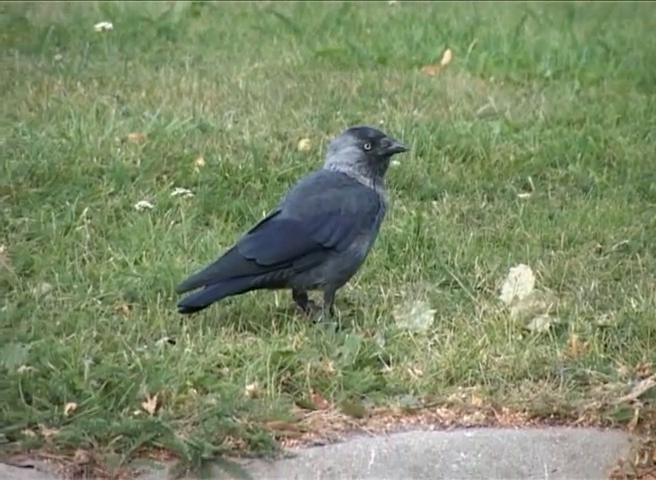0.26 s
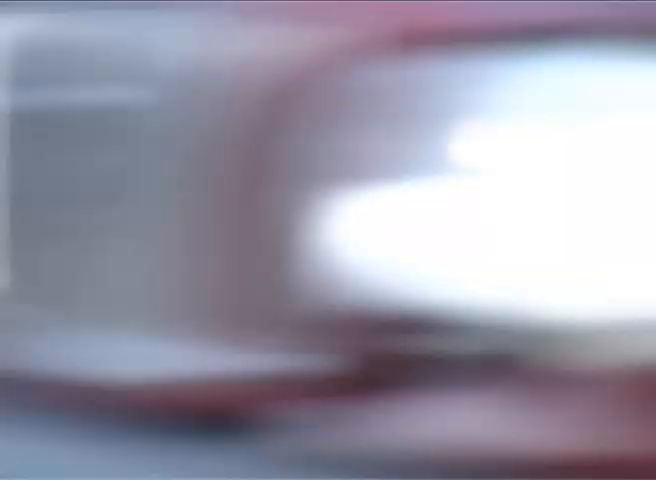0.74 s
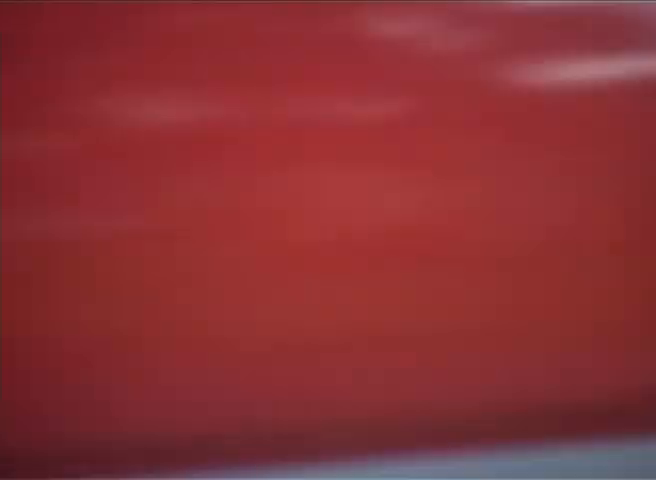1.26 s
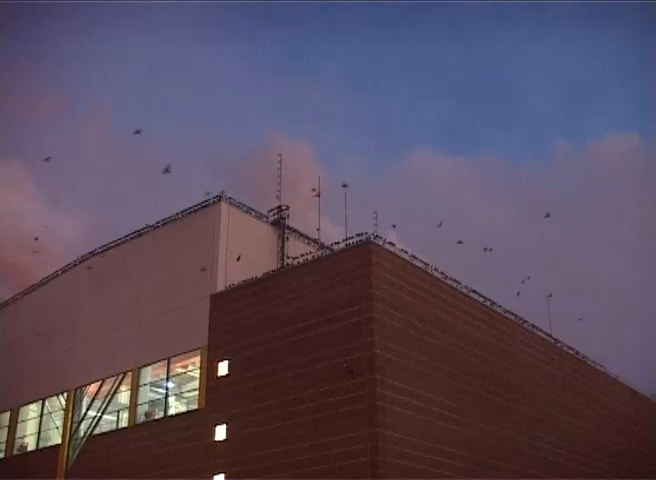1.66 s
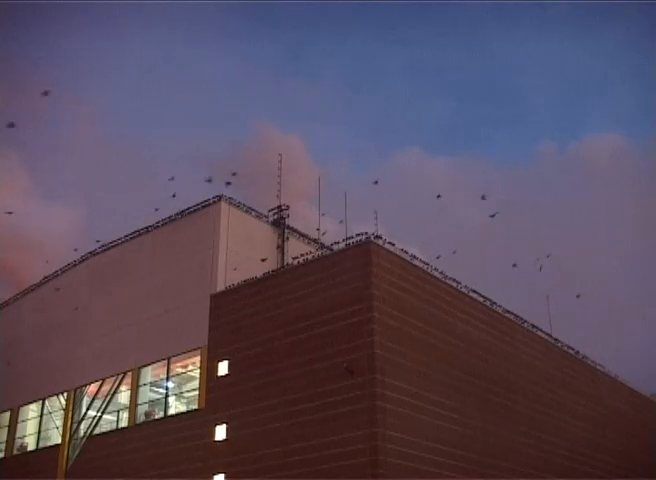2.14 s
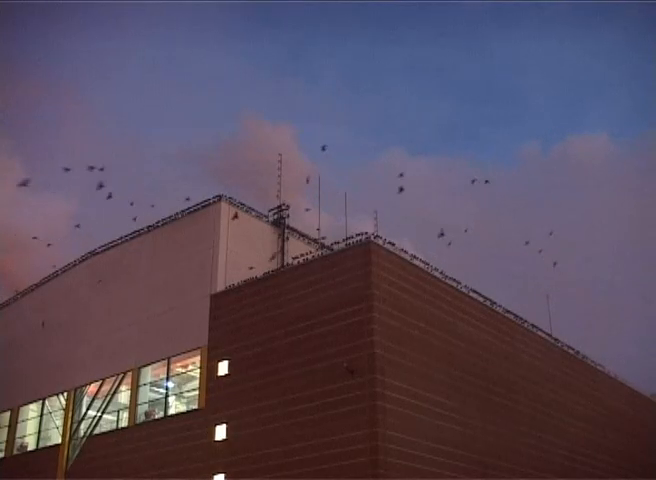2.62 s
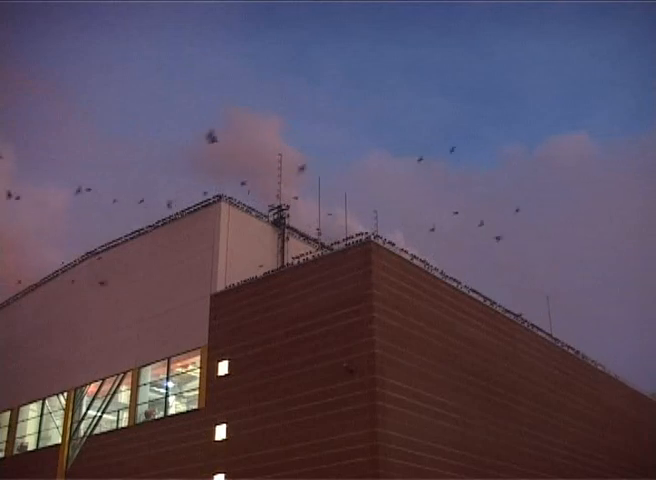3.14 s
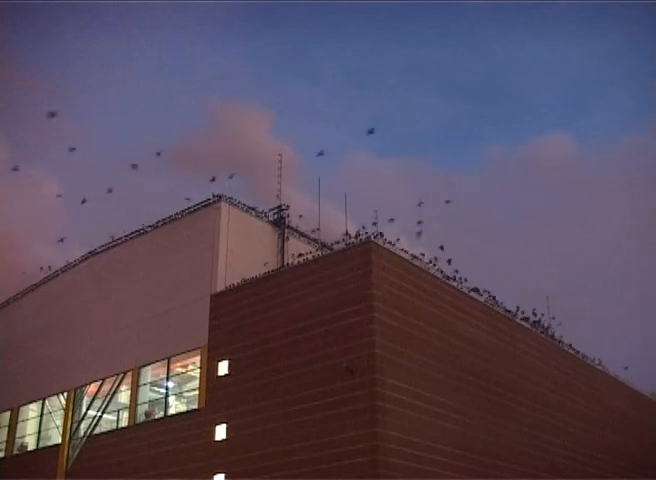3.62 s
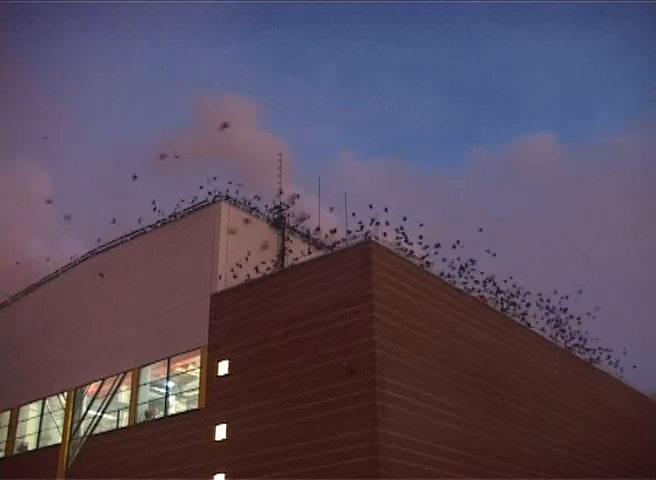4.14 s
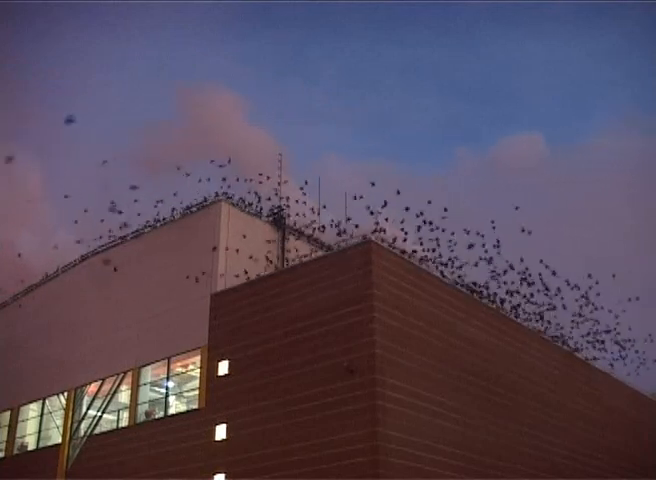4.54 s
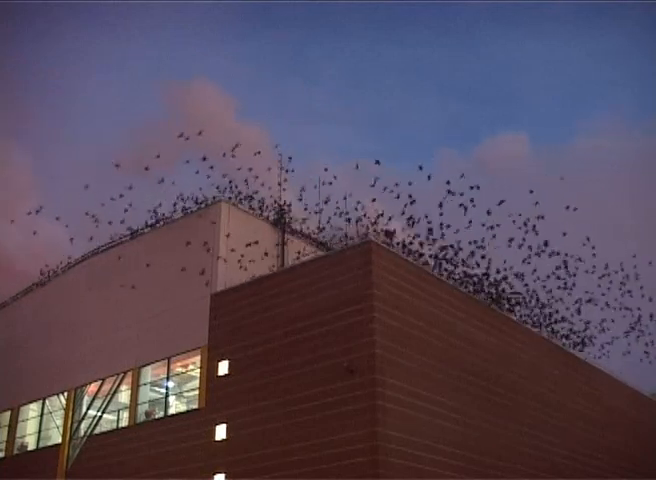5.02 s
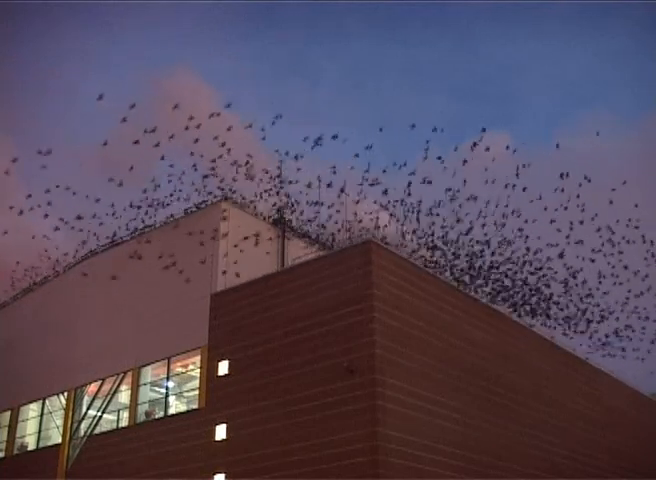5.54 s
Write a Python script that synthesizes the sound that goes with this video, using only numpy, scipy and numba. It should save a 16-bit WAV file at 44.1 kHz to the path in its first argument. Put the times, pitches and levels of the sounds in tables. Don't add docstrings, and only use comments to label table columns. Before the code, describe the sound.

A bus passes close with broad tyre and engine roar, shifting drone and faint air hiss, jackdaws chattering beneath. At a hard cut it vanishes; a dense flock calls around city roofs over soft traffic rumble. A small handheld camera adds low buzz, faint whine, rustles and two harsh plastic creaks midway. The chatter swells loudest near the end.

```python
import sys
import numpy as np
from scipy import signal
from scipy.fft import rfft, irfft, next_fast_len
from scipy.io import wavfile
from scipy.ndimage import uniform_filter1d
from numba import njit

SR = 44100
rng = np.random.default_rng(int(sys.argv[2]) if len(sys.argv) > 2 else 0)


def digitize_waveform(pressure):
    field = np.atleast_2d(pressure).T
    bounded = np.clip(field, -1, 1)
    quanta = np.round(bounded * 32767).astype(np.int16)
    wavfile.write(sys.argv[1], SR, quanta)


def gain_from_db(level_db):
    decades = np.asarray(level_db, float) / 20
    return 10 ** decades


N = 254898
TIME = np.arange(N) / SR
EDIT_S = 1.706
FRAME_HZ, SCAN_HZ, MOTOR_HZ = 25, 15625, 150

# t/s, hold/s, level/dB
CHATTER_WAVES = [(.17, 0.033, -36.5), (.33, 0.046, -36.5), (.55, 0.22, -39.5), (.8, 0.21, -35.5),
                 (1.23, 0.096, -38), (1.5, 0.12, -40), (1.69, 0.055, -39), (1.87, 0.12, -34),
                 (2.11, 0.25, -33), (2.44, 0.28, -34.5), (2.82, 0.081, -35.5), (2.9, 0.086, -31.5),
                 (3.16, 0.11, -33.5), (3.3, 0.29, -35.5), (3.62, 0.13, -34.5), (3.87, 0.031, -32),
                 (3.95, 0.19, -38), (4.264, 0.14, -33.5), (4.45, 0.28, -37), (4.68, 0.076, -39),
                 (4.82, 0.097, -33.5), (5.03, 0.013, -34.5), (5.08, 0.055, -32.5), (5.24, 0.036, -31.5),
                 (5.3, 0.02, -28), (5.4, 0.026, -25.5), (5.5, 0.18, -32), (5.64, 0.17, -28.5)]
# f/Hz, gain/dB
FAR_VOICE_TONE = [(500, -29), (1100, -11.5), (1550, -8.5), (1950, -3.5), (2350, 0), (2750, -3.5),
                  (3200, -20.5), (4200, -13.5), (5000, -20.5), (6100, -18), (6900, -32.5), (9000, -36.5)]
# t/s, length/s, first pitch f/Hz, last pitch f/Hz, level/dB
OPEN_CALLS = [(1.905, .022, 1320, 1186, -40), (2.106, .029, 1308, 1103, -43), (2.327, .03, 1605, 1430, -35),
              (2.637, .047, 1214, 1114, -44), (3.256, .029, 1573, 1178, -43), (3.055, .03, 1520, 1150, -44),
              (3.617, .074, 1235, 1070, -39), (3.85, .059, 1265, 1140, -39), (4.244, .03, 1447, 1200, -46),
              (4.692, .05, 1450, 1060, -37.5), (4.722, .032, 1530, 1215, -42),
              (5.065, .029, 1308, 1103, -44), (5.385, .018, 1510, 1400, -33),
              (5.394, .029, 1605, 1355, -37), (5.402, .058, 760, 625, -43), (5.543, .029, 1545, 1354, -40),
              (5.6, .032, 1300, 1130, -43)]
# t/s, length/s, first pitch f/Hz, last pitch f/Hz, level/dB
MELLOW_CALLS = [(1.848, .052, 1390, 980, -44), (1.94, .03, 1330, 1150, -48), (1.965, .05, 1250, 920, -47),
                (2.11, .035, 1280, 1050, -46), (2.91, .025, 1300, 1200, -47), (2.97, .03, 1300, 1150, -47),
                (3.39, .04, 1260, 1200, -47), (3.46, .035, 1330, 1180, -47), (4.49, .04, 1300, 1050, -49),
                (5.3, .035, 1340, 1230, -45), (5.41, .035, 1400, 1180, -42), (5.44, .03, 1400, 1100, -45),
                (5.61, .035, 1290, 1200, -46), (5.655, .035, 1250, 1080, -45), (1.9, .025, 1200, 980, -46),
                (2.45, .03, 1250, 1100, -49), (3.24, .035, 1250, 1080, -47), (2.05, .03, 1400, 1200, -49),
                (2.15, .03, 1330, 1200, -47), (2.246, .029, 1366, 1300, -48),
                (2.278, .029, 1150, 1024, -46), (2.506, .029, 1445, 1082, -47),
                (2.645, .04, 1200, 1050, -46), (2.93, .028, 1150, 940, -46), (2.95, .022, 1239, 1069, -47),
                (3.15, .035, 1250, 1080, -46), (3.6, .03, 1230, 1200, -49), (4.258, .022, 1324, 1200, -45),
                (4.349, .047, 1243, 1105, -52), (4.425, .04, 1340, 980, -46),
                (4.494, .022, 1358, 1269, -52), (4.712, .042, 1340, 990, -46),
                (4.81, .025, 1250, 1050, -50), (5.083, .029, 1330, 1208, -46),
                (5.122, .022, 1330, 1242, -46), (5.535, .029, 1245, 1132, -46),
                (5.669, .022, 1157, 1122, -44), (5.74, .038, 1270, 1150, -45)]
# t/s, first pitch f/Hz, level/dB
CHIPS = [(1.948, 1600, -46), (3.375, 1090, -45), (2.153, 1560, -46), (2.448, 1090, -42), (2.496, 1484, -41),
         (2.643, 1450, -44), (2.67, 1480, -47), (2.719, 1010, -45), (2.857, 1520, -45), (3.46, 1060, -43),
         (3.054, 1440, -48), (3.08, 1530, -46), (3.257, 1358, -42), (3.385, 1297, -45), (3.585, 1500, -44),
         (3.919, 1029, -42), (4.095, 1193, -40), (4.121, 1034, -42), (4.289, 1100, -41), (4.459, 1012, -43),
         (4.584, 1353, -43), (4.603, 1149, -45), (4.825, 1580, -44), (4.972, 1113, -41), (5.009, 1100, -43),
         (5.166, 1036, -40), (5.296, 1272, -38), (5.323, 1503, -38), (5.525, 1020, -43)]
# f/Hz, gain/dB
NEAR_VOICE_TONE = [(500, -22), (1600, -8), (2000, 0), (2400, 2), (2800, 0), (3250, -16), (4200, -17),
                   (5000, -21), (6100, -20), (6900, -30), (9000, -44)]

# t/s, f/Hz
FIRING_RATE = [
    (0, 81.7),
    (.3, 83.2),
    (.7, 83.74),
    (.98, 81.66),
    (1.07, 78.4),
    (1.1, 73.4),
    (1.215, 67.9),
    (1.42, 86.4),
    (1.7, 83.8),
]
# f/Hz, level/dB per Hz
ROAR_TONE = [(53, -49), (90, -58), (150, -4.5), (380, 0), (415, -3.5), (461, -2.5), (982, 2.5),
             (1370, -5.5), (2410, -10), (3130, -21), (6000, -38), (7800, -59), (13200, -120)]
# t/s, hold/s, level/dB
ROAR_PASS = [
    (.3, 1.1, -32.5),
]
# f/Hz, level/dB per Hz
HISS_TONE = [(1760, -31), (3000, -20), (3260, 0), (4290, 2.5), (5610, -5), (6300, 1.5), (7380, -8),
             (8070, -6), (8640, -18), (9580, -5), (10400, -14), (11400, -6), (13500, -17), (14800, -12),
             (15500, -23)]
# t/s, hold/s, level/dB
HISS_PASS = [
    (.93, 0.085, -53),
    (1.42, 0.059, -61.5),
]
BODY_DRONES = {2: [(.5, 0.44, -47.5), (1.09, 0.12, -40), (1.5, .2, -54)], 3: [(.15, 0.67, -45),
               (.88, 0.17, -38.5), (1.5, 0.21, -43.5)], 5: [(.1, 0.3, -40.5), (.6, 0.16, -48),
               (.9, 0.093, -41.5)], 9: [(.8, 0.19, -39.5)], 15: [(1.03, 0.056, -40)]}

# t/s, peak level/dB, ring f/Hz
SHORT_CREAK_SLIPS = [(3.7551, -15.5, 1850), (3.756, -12.0, 2130), (3.7571, -14.5, 1920),
                     (3.7595, -5.0, 1930), (3.7616, -6.0, 2030), (3.7632, -10.0, 2100),
                     (3.7645, -5.0, 2080), (3.7659, -9.5, 2390), (3.7687, -2.0, 2230),
                     (3.7707, -12.0, 2310), (3.7719, -4.5, 2270), (3.7728, -5.0, 2430),
                     (3.7743, -9.5, 2640), (3.7754, -11.0, 2050), (3.7767, 1.0, 1990), (3.7779, -5.5, 2010),
                     (3.7789, -6.5, 2640), (3.7799, -21.5, 2930), (3.7808, -6.5, 2280),
                     (3.7828, -12.5, 1870), (3.7841, -8.0, 2100), (3.7855, -2.0, 2070),
                     (3.7874, -11.5, 1770), (3.7891, -20.5, 2080)]
# t/s, peak level/dB, ring f/Hz
LONG_CREAK_SLIPS = [(3.9848, -18.5, 2150), (3.9908, -19.0, 2000), (3.9925, -23.0, 1750),
                    (3.9966, -21.5, 2190), (3.9998, -19.5, 2120), (4.0021, -7.0, 1890),
                    (4.0049, -14.5, 2130), (4.0082, -10.5, 2050), (4.0113, -10.0, 1850),
                    (4.0145, -7.5, 1930), (4.0162, -14.0, 2190), (4.0194, -8.5, 2060), (4.0256, -5.5, 1870),
                    (4.0272, -9.0, 2140), (4.0297, -15.5, 2160), (4.0312, -12.5, 1800),
                    (4.0328, -19.0, 2150), (4.0361, -11.0, 1980), (4.0388, -18.0, 2850),
                    (4.0409, -10.0, 1570), (4.0424, -13.0, 2300), (4.0454, -9.0, 1760),
                    (4.049, -13.5, 1880), (4.0505, -11.5, 2320), (4.052, -15.5, 1790),
                    (4.0547, -21.5, 2700), (4.0562, -13.0, 1670), (4.0585, -15.5, 1710),
                    (4.0599, -22.5, 1610), (4.0626, -17.0, 2020), (4.0657, -16.0, 1450),
                    (4.0673, -19.0, 2390), (4.0748, -24.5, 1930), (4.0784, -23.5, 2010),
                    (4.0838, -17.5, 1710), (4.0882, -17.0, 1970), (4.0915, -20.0, 1720),
                    (4.0951, -19.0, 1890), (4.0982, -17.0, 1870), (4.1, -17.0, 1860), (4.1038, -24.0, 1720),
                    (4.1064, -21.5, 2060), (4.1113, -20.5, 1820), (4.1153, -20.0, 2060),
                    (4.1175, -19.5, 1820), (4.1215, -22.5, 1780), (4.125, -23.5, 1560),
                    (4.132, -19.0, 2270), (4.1361, -19.0, 2110), (4.1379, -21.5, 2070),
                    (4.1407, -25.0, 2410), (4.1435, -25.0, 1660)]
# t/s, peak level/dB, ring f/Hz
SECOND_MODE_SLIPS = [(4.0025, -31, 3790), (4.0046, -30, 3560), (4.011, -27.5, 3550), (4.0163, -28, 3620),
                     (4.019, -22.5, 3330), (4.0267, -19, 3400), (4.0293, -23.5, 3610), (4.033, -26.5, 3660),
                     (4.0357, -24.0, 3690), (4.0391, -24.5, 3550), (4.044, -20, 3500), (4.0453, -22, 3400),
                     (4.0505, -21, 3480), (4.0548, -27.0, 3530), (4.0583, -28.0, 3450), (4.0622, -26, 3560),
                     (4.0652, -29.0, 3480), (4.0673, -31, 3500), (4.0881, -34, 3460), (4.0911, -36, 3580),
                     (4.0997, -30.0, 3500), (4.1097, -31, 3810), (4.1147, -36, 3410), (4.1258, -33, 3620),
                     (4.1334, -33, 3580), (4.1409, -34, 3690)]
# t/s, peak level/dB, ring f/Hz
TICKS = [(1.705, -39, 4950), (2.455, -39, 7800), (2.568, -37, 7800), (3.143, -37, 7000), (4.405, -38, 5600),
         (4.669, -32, 3920), (4.808, -23, 4000), (3.7605, -14, 3300), (3.7615, -20, 4100),
         (3.7725, -17, 3500), (3.7795, -15, 3400), (3.785, -17, 3500), (4.8075, -37, 7400),
         (5.4349, -21, 2570)]
# t/s, hold/s, level/dB
SCRAPES = [
    (3.757, 0.025, -24.5),
    (3.792, 0.019, -36.5),
    (3.995, .006, -39),
    (4.003, 0.013, -31),
    (4.027, 0.02, -29),
    (4.055, 0.012, -35),
    (4.072, .008, -40),
    (4.083, 0.018, -33.5),
    (4.108, 0.031, -38),
]
# f/Hz, gain/dB
CASING_TONE = [(300, -22), (900, -4), (1500, -2), (2300, -7.5), (3400, -3), (4300, -10), (5200, -21.5),
               (6000, -17), (7000, -27), (7600, -20), (8400, -26), (9200, -24.5), (14000, -37)]
# t/s, hold/s, level/dB
BRUSHES = [(1.72, 0.009, -58), (1.9, .06, -62), (2.12, 0.15, -62), (2.335, .01, -51.5), (2.44, 0.11, -56),
           (2.6, .06, -60), (2.92, 0.27, -61), (3.2, 0.092, -56), (3.42, 0.09, -54), (3.76, .02, -48),
           (3.85, 0.11, -60), (4.02, 0.12, -49), (4.3, 0.11, -52.5), (4.5, .2, -63), (4.81, 0.0033, -54),
           (4.88, 0.028, -53), (5.08, .05, -67), (5.3, 0.27, -53), (5.67, 0.056, -48)]
# f/Hz, level/dB per Hz
BRUSH_TONE = [(3820, 2), (6500, 1), (6940, -7), (7710, 5.5), (8450, -29), (9180, 2.5), (10000, -12),
              (11100, -1.5), (15100, -22), (15500, -19)]

# from t/s, level/dB
BUZZ_STEPS = [(0, -52), (.72, -62), (.95, -50), (.99, -56), (1.12, -63), (1.39, -45), (1.52, -42.5),
              (1.69, -46), (1.78, -59), (1.82, -45.5), (3.21, -52), (3.25, -41.5), (3.46, -50.5),
              (4.02, -62), (4.05, -42.5), (4.36, -45), (5.32, -46), (5.37, -42)]
# multiple of frame rate, level/dB
BUZZ_PARTIALS = [(1, 0.5), (3, -8), (5, -19), (7, -26), (9, -13.5)]
# f/Hz, level/dB
MOTOR_TONE = [(6000, -12), (8000, -1), (12000, -1), (15500, -8)]
# f/Hz, level/dB per Hz
TOWN_TONE = [(53, -22), (90, -16), (119, -10), (403, -5.5), (749, -8.5), (1490, -7), (2280, -5),
             (2590, -6.5), (3280, -19.5), (5850, -28.5), (7090, -38.5), (11100, -46.5), (15000, -47.5)]
# from t/s, top f/Hz
BANDWIDTH_STEPS = [(0, 14300), (1.1, 15650), (1.58, 15000), (1.9, 14500), (2.57, 15650), (2.8, 14500),
                   (3.3, 15650), (3.65, 14900), (4.0, 15300), (4.5, 14600), (5.3, 14700)]


def level(x, db):
    return x * gain_from_db(db) / np.sqrt(np.mean(x ** 2))


def shade(hz, points):
    f, db = np.transpose(points)
    return gain_from_db(np.interp(np.log(hz + 1), np.log(f), db))


def colour(x, points):
    size = next_fast_len(len(x))
    gain = shade(np.fft.rfftfreq(size, 1 / SR), points)
    return irfft(rfft(x, size) * gain, size)[:len(x)]


def walk(rate_hz):
    hold = int(SR / rate_hz)
    steps = np.repeat(rng.standard_normal(N // hold + 1), hold)
    return 1.36 * uniform_filter1d(uniform_filter1d(steps, hold), hold)[:N]


def swells(rows, rise_db_s, fall_db_s):
    power = 0
    for s, hold_s, db in rows:
        rise_db = rise_db_s * np.maximum(s - TIME, 0)
        fall_db = fall_db_s * np.maximum(TIME - s - hold_s, 0)
        power = power + gain_from_db(db - rise_db - fall_db) ** 2
    return np.sqrt(power)


def rush(points, flicker_db, rate_hz):
    size = next_fast_len(N)
    hz = np.fft.rfftfreq(size, 1 / SR)
    spectrum = rfft(rng.standard_normal(size)) * shade(hz, points)
    octave = np.log2(hz / 30 + 1e-9)
    total = np.zeros(N)
    for k in range(10):
        band = irfft(spectrum * np.clip(1 - abs(octave - k), 0, 1), size)[:N]
        total += gain_from_db(flicker_db * walk(rate_hz)) * band
    return level(total, 0)


@njit
def voices(start, length, first, last, bend, arch, size, weight, wobble, out):
    for c in range(len(start)):
        phase = 0.
        for i in range(min(length[c], len(out) - start[c])):
            u = i / length[c]
            hz = first[c] + (last[c] - first[c]) * u ** bend[c] + arch[c] * np.sin(np.pi * u)
            w = (i + 977 * c) % wobble.shape[1]
            phase += 2 * np.pi * hz * (1 + wobble[0, w]) / SR
            turn, partial, total = np.exp(1j * phase), 1 + 0j, 0.
            for k in range(weight.shape[1]):
                partial *= turn
                total += (weight[c, k] * partial).imag
            out[start[c] + i] += size[c] * np.sqrt(np.sin(np.pi * u)) * (1 + wobble[1, w]) * total
    return out


def sing(s, length_s, first_hz, last_hz, db, beak_hz, beak_db, uneven_db, flutter, rasp):
    hz = np.arange(1, 11) * (first_hz + last_hz)[:, None] / 2
    lift_db = beak_db * np.exp(-((hz - beak_hz[:, None]) / 1100) ** 2)
    lift_db = lift_db + uneven_db * rng.standard_normal(hz.shape)
    weight = gain_from_db(lift_db) * (hz < 11000) * np.exp(2j * np.pi * rng.random(hz.shape))
    wobble = np.array([flutter * walk(300), rasp * walk(500)])
    bend = 1 + np.where(length_s > .055, 25, 8) * length_s
    arch_hz = 900 * length_s * (length_s > .06)
    start, length = (s * SR).astype(int), (length_s * SR).astype(int)
    return voices(start, length, first_hz, last_hz, bend, arch_hz, gain_from_db(db), weight, wobble, np.zeros(N))


def echoes(x, t60_s, wet_db):
    t = TIME[:SR // 2]
    tail = rng.standard_normal(len(t)) * np.exp(-np.log(1000) * t / t60_s) * (t > .012)
    return x + gain_from_db(wet_db) * signal.fftconvolve(x, level(tail, 0) / np.sqrt(len(t)))[:N]


def flock(count=1400):
    when, long, pitch, fall, far, beak, low = rng.random((count, 7)).T
    first_hz = (1080 + 520 * pitch) * np.where(low < .2, .55, 1)
    last_hz = first_hz * (.92 - .25 * fall)
    calls = sing(when * N / SR, .012 + .04 * long, first_hz, last_hz, -10 * far, 2000 + 4200 * beak,
                 beak_db=1, uneven_db=2.5, flutter=.005, rasp=.3)
    crowd = echoes(colour(calls, FAR_VOICE_TONE), t60_s=.25, wet_db=-6)
    even = crowd / np.sqrt(uniform_filter1d(crowd ** 2, SR // 14))
    return even * swells(CHATTER_WAVES, rise_db_s=302, fall_db_s=114) * gain_from_db(-3.5)


def near_birds():
    chips = [(s, .025, hz, hz * (1 - .06), db) for s, hz, db in CHIPS]
    calls = [*OPEN_CALLS, *chips, *MELLOW_CALLS]
    s, length_s, first_hz, last_hz, db = np.transpose(calls)
    kind = np.repeat([0, 1, 2], [len(OPEN_CALLS), len(chips), len(MELLOW_CALLS)])
    second_hz = first_hz + last_hz
    beak_hz = np.where(kind == 0, 5100, np.where(kind == 1, 2 * second_hz, second_hz))
    db = db + .3 + 2.5 * (kind == 0)
    song = sing(s, length_s, first_hz, last_hz, db, beak_hz,
                beak_db=14, uneven_db=1.2, flutter=.003, rasp=.27)
    return echoes(colour(song, NEAR_VOICE_TONE), t60_s=.2, wet_db=-12)


def engine_drone():
    s, hz = np.transpose(FIRING_RATE)
    firing_hz = np.interp(TIME, s, hz) * (1 + .002 * walk(31.6))
    phase = 2 * np.pi * np.cumsum(firing_hz) / SR
    total = np.zeros(N)
    for k, rows in BODY_DRONES.items():
        gain = swells(rows, rise_db_s=84, fall_db_s=300) * gain_from_db(2 + .5 * walk(12.8))
        total += gain * np.sin(k * phase)
    return total


def bus():
    roar = swells(ROAR_PASS, rise_db_s=9.5, fall_db_s=8) * gain_from_db(0.74) * rush(ROAR_TONE, 0.16, 9.0)
    hiss = swells(HISS_PASS, rise_db_s=9, fall_db_s=54) * gain_from_db(7.0) * rush(HISS_TONE, 0.28, 8.5)
    return (roar + hiss + engine_drone()) * np.clip((EDIT_S - TIME) / 0.0026, 0, 1)


def ring(rows, rise_s, fall_s):
    lead_s = .0015
    out, t = np.zeros(N + 300), TIME[:300] - lead_s
    for s, db, hz in rows:
        at = int((s - lead_s) * SR)
        envelope = np.exp(-(t / np.where(t < 0, rise_s, fall_s)) ** 2)
        out[at:at + 300] += gain_from_db(db) * np.cos(2 * np.pi * hz * t) * envelope
    return out[:N]


def creak():
    slips = ring([*SHORT_CREAK_SLIPS, *LONG_CREAK_SLIPS, *SECOND_MODE_SLIPS], rise_s=.00042, fall_s=.00075)
    slips += ring(TICKS, rise_s=.0002, fall_s=.0003)
    rings = colour(slips, [(300, -32), (800, -13), (1300, 0), (2000, -.5), (15000, 0)])
    chance, size = rng.random((N, 2)).T
    grains = (chance < .2) * rng.standard_normal(N) * gain_from_db(-1.2 * np.log(size))
    scrape = level(grains, 0) * swells(SCRAPES, rise_db_s=2500, fall_db_s=1300) * gain_from_db(13)
    return rings + colour(scrape, CASING_TONE)


def rustle():
    grain_db = 3.6 * walk(150) + 1.9 * walk(35)
    brushes = swells(BRUSHES, rise_db_s=350, fall_db_s=220)
    return (TIME > EDIT_S) * brushes * gain_from_db(grain_db) * rush(BRUSH_TONE, 1.0, 20)


def frame_buzz():
    s, db = np.transpose(BUZZ_STEPS)
    step = gain_from_db(db + 1.5)[np.searchsorted(s, TIME, "right") - 1]
    gain = uniform_filter1d(step, SR // 200) * gain_from_db(1.3 * walk(8) + 1.6 * walk(45))
    turn = 2 * np.pi * FRAME_HZ * (TIME - .0012)
    return gain * sum(gain_from_db(p_db) * np.cos(k * turn) for k, p_db in BUZZ_PARTIALS)


def motor():
    hz = MOTOR_HZ * np.arange(40, 104)
    size = shade(hz, MOTOR_TONE) * gain_from_db(-83 + 2 * rng.standard_normal(len(hz)))
    phase = 2 * np.pi * rng.random(len(hz))
    t = np.arange(SR // MOTOR_HZ)[:, None] / SR
    return np.resize((size * np.sin(2 * np.pi * hz * t + phase)).sum(axis=1), N)


def town():
    return gain_from_db(-35 - 2.4 * (TIME < EDIT_S)) * rush(TOWN_TONE, 0.9, 6)


def scene():
    birds = flock() + near_birds()
    handling = creak() + rustle()
    return (birds + bus() + handling + frame_buzz() + motor() + town())[None]


def scan_whistle(top_hz):
    wide = uniform_filter1d(1. * ((top_hz > 15400) | (TIME < 1.1)), SR // 30)
    return gain_from_db(-76.5) * wide * np.sin(2 * np.pi * SCAN_HZ * TIME)


def band_limit(x):
    return signal.sosfilt(signal.butter(12, 15710, fs=SR, output="sos"), x)


def record(dry):
    s, top_hz = np.transpose(BANDWIDTH_STEPS)
    hz, t, frames = signal.stft(np.clip(dry, -.97, .97), SR, nperseg=1024)
    hz = hz[:, None]
    edge_hz = top_hz[np.searchsorted(s, t, "right") - 1]
    patches = uniform_filter1d(rng.standard_normal(frames.shape[1:]), size=24, axis=1)
    patches = uniform_filter1d(patches, size=3, axis=0) * np.sqrt(72)
    keep = (hz < edge_hz + 500 * patches) & (hz < 15710)
    keep &= (hz < 7000) | (patches > -1.5)
    cut = signal.istft(frames * keep, SR, nperseg=1024)[1][:, :N]
    mix = cut + scan_whistle(np.interp(TIME, t, edge_hz))
    return band_limit(mix)


dry = scene()
out = record(dry)
digitize_waveform(out)
```